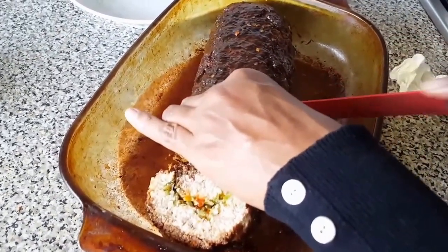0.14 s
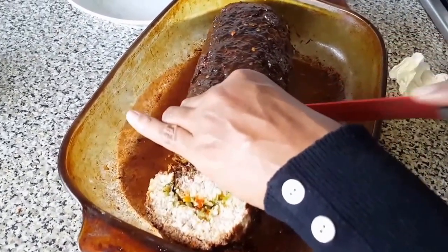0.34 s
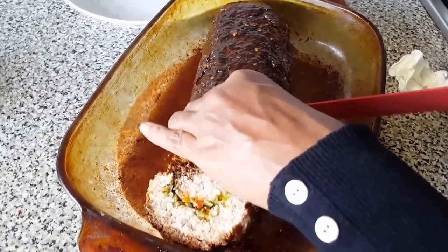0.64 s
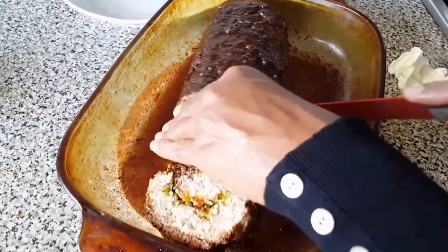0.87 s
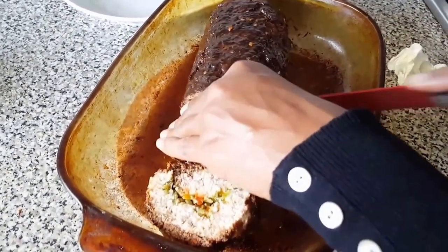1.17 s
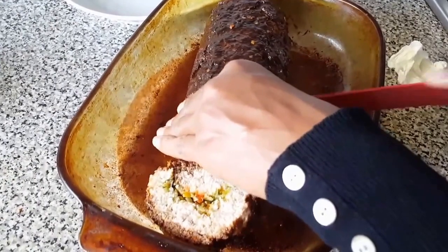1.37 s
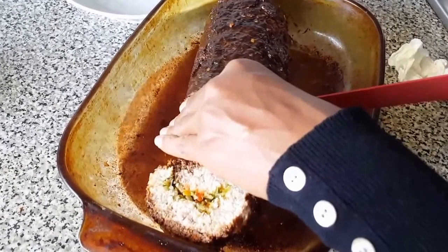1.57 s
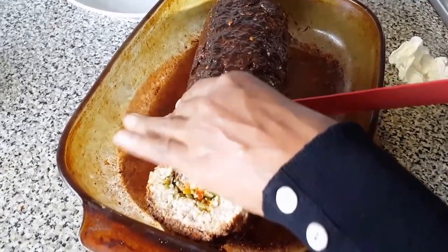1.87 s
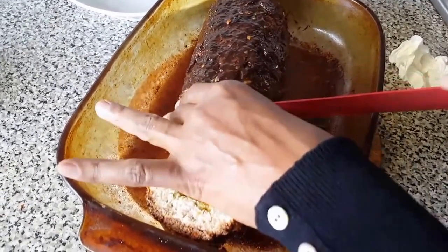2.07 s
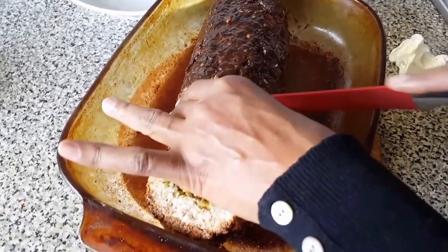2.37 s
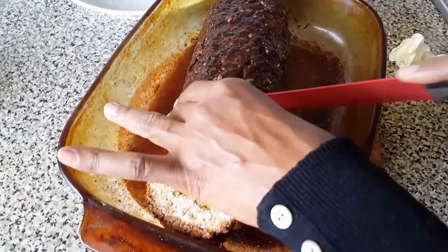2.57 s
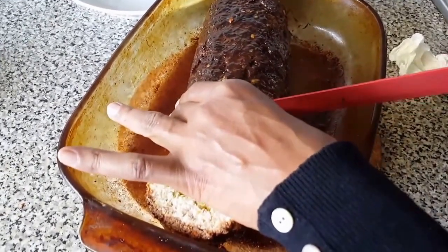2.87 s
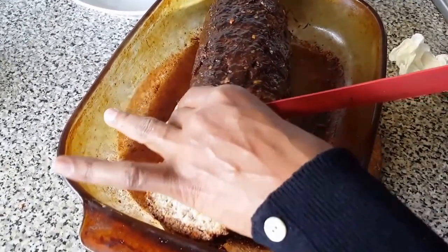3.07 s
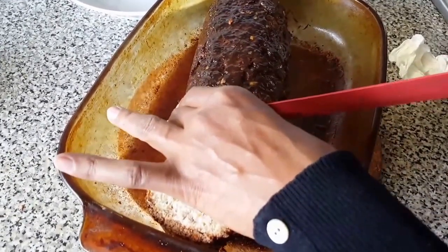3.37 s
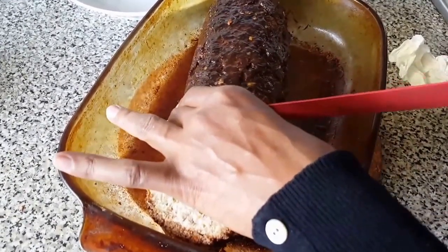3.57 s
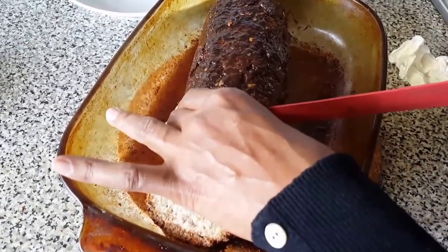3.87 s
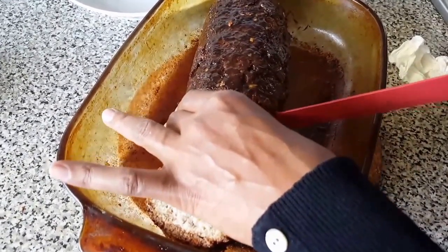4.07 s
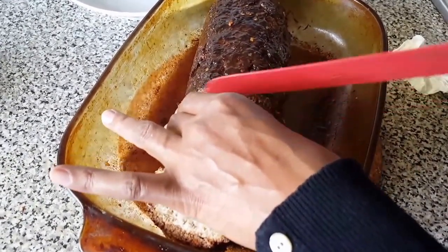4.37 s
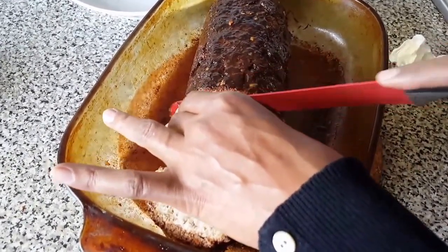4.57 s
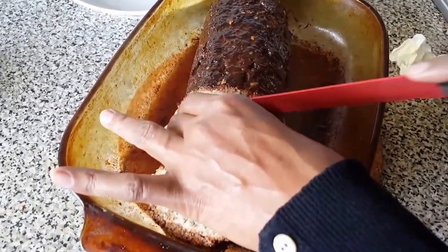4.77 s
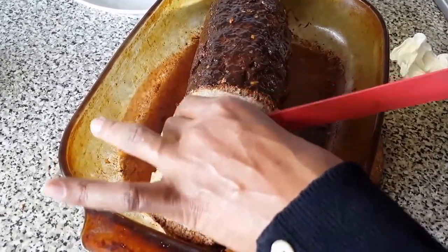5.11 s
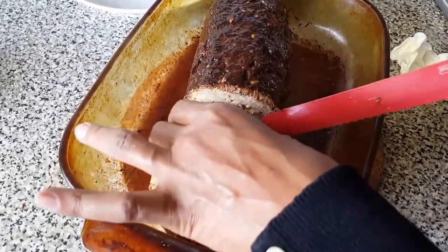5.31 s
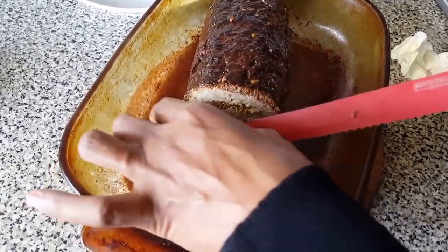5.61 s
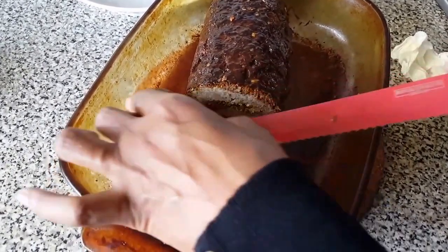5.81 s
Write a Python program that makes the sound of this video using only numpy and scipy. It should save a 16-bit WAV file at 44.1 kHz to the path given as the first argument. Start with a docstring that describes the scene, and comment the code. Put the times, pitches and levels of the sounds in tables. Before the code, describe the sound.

A serrated knife saws through a crusty baked roll, its blade clicking, knocking and scraping on a ceramic dish over a faint kitchen hum.

```python
"""A small hard kitchen, a stereo camera close to a ceramic dish; appliances hum throughout.
From the start a serrated knife saws through a baked roll: the crust crackles, each push makes the
worktop drone, and the blade knocks and scrapes on the dish, ringing it while the worktop booms.
The hardest knock comes at 4.7 s. After a few more scrapes the sawing dies down, and two soft bumps
on the worktop close the scene near 6 s."""
import sys
import numpy as np
from scipy import signal
from scipy.fft import rfft, irfft, next_fast_len
from scipy.io import wavfile
from scipy.ndimage import uniform_filter1d

SR = 44100
rng = np.random.default_rng(int(sys.argv[2]) if len(sys.argv) > 2 else 0)


def wrap_up_sound(samples):
    """Save the sound to the file named by the first command line argument, as 16-bit audio."""
    columns = np.atleast_2d(samples).T
    # keep every value between -1 and 1, then stretch to whole-number steps
    tamed = np.clip(columns, -1, 1)
    steps = np.round(tamed * 32767).astype(np.int16)
    wavfile.write(sys.argv[1], SR, steps)


N = 262306

# room tone behind the dish: f/Hz, relative level/dB
ROOM_TONE = [(12, -23.5), (20, -2), (49, -6), (101, -5.5), (203, -18), (345, -22.5), (419, -25), (539, -20),
             (866, -23), (1690, -24.5), (9300, -43), (13700, -32.5), (15800, -50.5)]
# appliance resonances: f/Hz, width/Hz, level/dB
APPLIANCES = [(239, 42, -71.5), (346.2, 12, -73), (576, 76, -72)]
# decay of the wall echoes: f/Hz, t60/s
WALL_DECAY = [(300, 0.18), (1100, 0.12), (3000, 0.23), (8000, 0.2)]
# roll and dish bump on the worktop: t/s, level/dB, f/Hz, level of the knock on top/dB
BUMPS = [(1.483, -37, 97.6, -54.5), (5.655, -48, 173, -49.5), (5.792, -52, 190, -48)]
# the hand leans on the roll: t of the top/s, length/s, drone level/dB
PUSHES = [(0.0, 0.23, -52), (0.27, 0.15, -55), (0.464, 0.12, -54), (0.665, 0.11, -52), (0.864, 0.14, -60),
          (0.993, 0.11, -59), (1.387, 0.18, -59.5), (1.556, 0.14, -56), (1.958, 0.38, -68),
          (2.497, 0.246, -63.5), (2.936, 0.3, -61), (3.146, .1, -68), (3.35, 0.13, -59.5),
          (3.559, 0.2, -69), (3.778, .1, -56), (3.877, 0.13, -56), (4.085, 0.17, -60),
          (4.266, 0.108, -77.5), (4.598, 0.097, -65.5), (4.953, 0.23, -64), (5.197, 0.22, -68),
          (5.727, 0.24, -66.5)]
# spectrum of the rustling crust: f/Hz, relative level/dB
RUSTLE_SPECTRUM = [(1530, -39.5), (2600, -15.5), (3180, -6.5), (4810, -3), (8450, -6), (14000, -11.5),
                   (14900, -26.5), (15300, -40.5)]
# course of the sawing: t/s, crust gain/dB
SAWING_GAIN = [(0.0, -66), (0.21, -71.5), (0.79, -70), (1.44, -65), (1.54, -66.5), (2.02, -73),
               (2.47, -72.5), (3.23, -70), (3.36, -70), (3.61, -71.5), (3.78, -66), (4.32, -79),
               (4.72, -86), (4.85, -64.5), (5.15, -71), (5.33, -80), (5.51, -75), (5.95, -85.5)]
# crust snaps under the teeth: t/s, level/dB, f/Hz, left minus right/dB
SNAPS = [(0.0365, -39.5, 3500, 3), (0.199, -51, 8000, 4), (0.277, -42, 6500, 1), (0.431, -39, 8550, 7),
         (0.782, -57, 5450, -25), (0.817, -50, 8960, 7), (0.852, -28, 7040, 2.5), (0.8703, -51, 3800, 7),
         (1.138, -42.5, 7000, 0.3), (1.427, -44, 5154, 0), (1.482, -37, 5610, 2), (1.738, -43.5, 8670, 4),
         (1.7581, -38, 4758, -1), (1.83, -56, 7120, -15), (1.884, -38, 5410, -0.5),
         (1.9513, -43.5, 8200, 1.5), (2.663, -44.5, 7200, 1), (2.8653, -49, 5900, -7),
         (2.9537, -48.5, 4324, -13), (2.966, -40, 5100, -2), (3.012, -51, 5300, -14.5),
         (3.049, -48, 7090, -5), (3.081, -40.5, 4700, -4), (3.0969, -44.5, 7050, -13),
         (3.1237, -44.5, 3380, -3), (3.3602, -42.5, 3920, 4), (3.5319, -51, 8700, -5),
         (3.7179, -34, 4070, -5), (3.91, -39.5, 6440, -2), (4.262, -46, 8238, 1.5), (4.32, -57, 5140, -2),
         (4.4062, -53.5, 5190, -13.5)]
# modes of the dish: f/Hz, relative level/dB, t60/s
DISH_MODES = [(745.3, -8, 0.23), (825.5, -12, 0.17), (947.2, -8, 0.16), (990, -7, 0.16), (1088, -9, 0.19),
              (1221.5, 4, 0.099), (1289, 10, 0.06), (1480, -0.5, 0.06), (1591, -5.5, 0.11),
              (1908, -5, 0.12), (2075, -6.5, 0.28), (2280, -8.5, 0.15), (2452, -8.5, 0.11),
              (2933, -16, 0.21), (3120, -12, 0.15), (3280, -20, 0.43), (3480, -5.5, 0.12), (3530, -3, 0.11),
              (3777, -1, 0.11), (4050, -5.5, 0.098), (4065, -8.5, 0.044), (4750, -19.5, 0.036),
              (5100, -5.5, 0.13), (5980, -9.5, 0.086), (5370, -10, 0.1), (6460, -22.5, .13),
              (7494, -10, 0.13), (9400, -18, 0.15)]
# bands in which the blade drives the dish: f/Hz
BANDS_HZ = [700, 1300, 2200, 4000, 7500, 12000]
# an average blow in each of those bands: relative level/dB
BLOW_SHARE_DB = [0, -1, -6, -2.5, -8, -27.5]
# teeth along the dish: t/s, length/s, gain/dB, swell/dB, dull rasp/dB, 2 kHz modes/dB, bright rasp/dB
STROKES = [(0.16, 0.12, -76.5, 6, 0, -6, 8.5), (0.4, 0.049, -70, 4, 1.5, -9.5, 8.5),
           (0.602, 0.086, -68.5, -1.5, -1, -7, 11.5), (0.827, 0.067, -70.5, -1.5, 0.3, -6, 12.5),
           (0.989, 0.1, -68.5, 1.5, 1, -8, 1), (1.115, 0.067, -85, 0.3, -7, -1, 9),
           (1.389, 0.039, -53, -12, -7, -12, -22), (1.47, 0.14, -61, -17, -5.5, -10, 9.5),
           (2.424, 0.098, -60.5, -4, -9.5, 3.5, 2), (2.594, .15, -65, 1.5, -13, -8, 2),
           (2.778, 0.052, -49, -10.5, -6, 4.5, 2), (2.993, 0.019, -62, -5.5, 4, -20, -13),
           (3.066, 0.056, -69, 8.5, -8, -16, 7.5), (3.171, 0.055, -64, 5.5, 4, 3, -2),
           (3.244, 0.041, -48, -6.5, -1.8, -2.5, -6), (3.338, 0.04, -61.5, 5.5, -3, 0, -3),
           (3.661, 0.05, -55, -13, -2, 2, -14), (3.701, 0.01, -38.5, -3.5, -20, -23, -10),
           (3.818, 0.081, -60.5, 0.5, 6.5, 12, 3), (3.971, 0.023, -70.5, -2.2, 5.5, 8, -3),
           (4.017, 0.097, -62, -2.5, -1.5, 8, 6), (4.789, 0.049, -56, 0, -15, -10, -22),
           (4.849, 0.17, -60.5, 3, -3, 6.5, 1.5), (5.019, 0.026, -40.5, -4.5, -15, -15, -12),
           (5.166, 0.046, -62.5, 5.5, -19, 2, 5), (5.248, 0.035, -67, -4, -16, 2, -4),
           (5.309, 0.16, -65, -2.5, -9, -1.5, 2), (5.51, 0.014, -58, -8.5, -6, 3.5, -16.5)]
# blade on the dish: t/s, level/dB, low modes/dB, hardness/(dB per octave), boom/dB, left minus right/dB
KNOCKS = [(0.057, -14, -14, 2, -40.5, -1), (0.492, -14, -6, 2.5, -40.5, -0.5),
          (0.9, -10, -6.5, 1.5, -39.5, -2), (1.02, -44, 10, -0.5, -84.5, -11.5),
          (1.218, -53, 2, 1.5, -54, -5), (1.24, -8, -12, 1.34, -37.5, -0.5),
          (2.24, -15, -10.5, 0, -43.5, -2), (2.256, -20, 14.5, -3.5, -40.5, 2.5),
          (2.273, -15.5, -3, 0, -37.5, -1), (2.754, -20, -5.5, -1.5, -45, -2),
          (3.008, -45.5, -1, -7, -60, 6), (3.221, -20, -21, -3.5, -50, 4.5),
          (3.228, -28.5, -10, -9, -43, -6), (3.609, -11, -8.5, -3, -40.5, 0),
          (3.706, -31, -34, -2.5, -52.5, 1.5), (3.794, -21, 0, -2.5, -49, -1.5),
          (4.679, -5.5, -1.5, 4, -31.5, -1), (5.024, -28, -15, -6, -54, -0.5),
          (5.469, -46.5, -18, 2, -76.5, 3), (5.517, -49.5, -10, -8, -65, -5)]
# at the microphones the treble favours the right: f/Hz, left minus right/dB
SIDE_BIAS = [(250, 0), (500, 0), (1500, 2.9), (4000, -3.5), (10000, -3.5)]

ROOM_TONE_DB, DRONE_REST_DB = -65.5, -69.5
WORKTOP_HZ, WORKTOP_UPPER_HZ, WORKTOP_T60_S = 103, 145.4, 0.26
STROKE_ATTACK_S, STROKE_T60_S = 0.013, 0.094
BOUNCE_S, BOUNCE_DB = 0.0068, -4.5
CAMERA_TOP_HZ = 15200


def undb(db):
    """Gain of a level in dB."""
    return 10 ** (np.asarray(db) / 20)


def rms(x):
    """Root mean square."""
    return np.sqrt(np.mean(x ** 2))


def level(x, db):
    """Scale to an rms level."""
    return x * undb(db) / rms(x)


def fade(t, t60):
    """Envelope that falls 60 dB in t60 s."""
    return np.exp(-np.log(1000) * t / t60)


def colour(x, table):
    """Shape the spectrum by points of f/Hz, gain/dB."""
    hz, db = np.transpose(table)
    n = next_fast_len(x.shape[-1])
    f = np.maximum(np.fft.rfftfreq(n, 1 / SR), 1)
    gain = undb(np.interp(np.log(f), np.log(hz), db))
    return irfft(rfft(x, n) * gain, n)[..., :x.shape[-1]]


def band(x, hz, width):
    """One resonance, its width in Hz."""
    return signal.lfilter(*signal.iirpeak(hz, hz / width, fs=SR), x)


def wander(rate, size=N):
    """Glide to a new random value every 1 / rate s; spread near 1."""
    hold = int(SR / rate)
    steps = np.repeat(rng.standard_normal(size // hold + 1), hold)
    return 1.1 * uniform_filter1d(steps, hold)[:size]


def grit(spread_db, channels, size=N):
    """Dense clicks of uneven size."""
    return rng.standard_normal((channels, size)) * undb(spread_db * np.minimum(rng.exponential(size=size), 4))


def add(out, start, sound, pan_db=0):
    """Mix a sound in at start/s; pan_db is left minus right."""
    i = int(start * SR)
    n = min(sound.shape[-1], N - i)
    out[:, i:i + n] += sound[..., :n] * undb(np.array([[pan_db], [-pan_db]]) / 2)


def kitchen():
    """Room tone, alike at both microphones only in the bass, with wavering appliance hum."""
    mid, side = colour(rng.standard_normal((2, N)), ROOM_TONE)
    side = colour(side, [(40, -13.5), (100, -7.5), (300, 6), (1000, 1.5)])
    air = level(np.array([mid + side, mid - side]), ROOM_TONE_DB)
    hum = sum(level(band(rng.standard_normal(N), hz, width), db) * undb(0.83 * wander(9.1))
              for hz, width, db in APPLIANCES)
    return air + hum


def wall_echoes(x, wet_db):
    """Dense echoes of hard walls close by, each band dying at its own rate."""
    t = np.arange(SR // 3) / SR
    tail = sum(band(rng.standard_normal((2, len(t))), hz, hz) * fade(t, t60) / np.sqrt(hz * t60)
               for hz, t60 in WALL_DECAY)
    tail *= t > 0.004  # nearest wall
    tail /= np.sqrt(np.sum(tail ** 2) / 2)
    return undb(wet_db) * signal.oaconvolve(x, tail, axes=1)[:, :N]


def bumps():
    """Roll and dish bump the worktop: a short low ring with a knock on top."""
    out, t = np.zeros((2, N)), np.arange(SR // 3) / SR
    for start, db, hz, knock_db in BUMPS:
        low = undb(db) * np.sin(2 * np.pi * hz * t) * fade(t, 25 / hz)
        knock = band(band(rng.standard_normal(len(t)), 320, 400), 314, 405)
        knock = level(knock, knock_db) * fade(t, 0.092)
        add(out, start, (low + knock) * (1 - fade(t, 0.043)))
    return out


def worktop_drone():
    """Each push of the hand swells the worktop's low resonance."""
    t = np.arange(N) / SR
    cycles = np.cumsum(WORKTOP_HZ + 4 * wander(25)) / SR
    rumble = 0.89 * level(band(rng.standard_normal(N), WORKTOP_HZ, 25), -3.2)
    pushes = sum(undb(db) * np.exp(-(2 * (t - top) / length) ** 2) for top, length, db in PUSHES)
    return level(np.sin(2 * np.pi * cycles) + rumble, 0) * (undb(DRONE_REST_DB) + pushes)


def worktop_boom():
    """The worktop answers a blow a little late, with a low tone and a rattle above it."""
    t = np.arange(SR // 4) / SR
    low = fade(t, WORKTOP_T60_S) * np.sin(2 * np.pi * WORKTOP_HZ * t)
    noise = rng.standard_normal((3, len(t)))  # shared, left, right
    rattle = level(band(noise[0] + 0.4 * noise[1:], WORKTOP_UPPER_HZ, 160), -1.5)
    return (1 - fade(t, 0.024)) * (low + 0.72 * fade(t, 0.18) * rattle)


def crackle(per_s=70, spread_db=3):
    """Tiny crumbs break at random, per_s times a second in each of four treble bands."""
    out = 0
    for hz in (4500, 6500, 9000, 12000):
        breaks = (rng.random(N) < per_s / SR) * undb(spread_db * rng.exponential(size=N))
        envelope = signal.lfilter([1], [1, -fade(1 / SR, 0.016)], breaks)
        out += level(band(envelope * rng.standard_normal((2, N)), hz, hz / 2), 0)
    return out


def sawing():
    """The crust rustles and crackles under the moving teeth."""
    t = np.arange(N) / SR
    crumbs = grit(3.6, channels=2) * undb(3.5 * np.clip(wander(56), -2, 2))
    crust = level(colour(crumbs, RUSTLE_SPECTRUM), 0.26) + level(crackle(), -5.5)
    return crust * undb(np.interp(t, *np.transpose(SAWING_GAIN)))


def snaps():
    """The crust breaks in bursts of a few ms, each around its own pitch."""
    out, t = np.zeros((2, N)), np.arange(1024) / SR
    for start, db, hz, pan_db in SNAPS:
        burst = rng.standard_normal((2, len(t))) * fade(t, 0.016)
        burst = band(band(burst, hz, hz), hz, hz)
        nominal_peak = 3.5 * rms(burst[:, :100])
        add(out, start, burst * undb(db) / nominal_peak, pan_db)
    return out


def dish(share_db, t60_scale, linger=0.094, lag_s=0.00008, detune=0.0065, split_hz=30, size=SR // 6):
    """Ring of the dish; each mode reaches the two microphones with its own phase difference."""
    hz, db, t60 = np.transpose(DISH_MODES)[:, :, None]
    t = np.arange(size) / SR
    gain_draw, pitch_draw, phase_draw, split_draw, beat_draw = rng.standard_normal((5, len(hz), 1))
    hz = hz * (1 + detune * pitch_draw)
    gain = undb(db + np.interp(np.log(hz), np.log(BANDS_HZ), share_db) + 1.5 * gain_draw)
    gain[1::2] *= -1  # neighbouring modes swing opposite ways under the blade
    # the hand and the roll soak up most of the ring at once, a little lingers
    decay = fade(t, t60_scale * t60) + linger * fade(t, t60) * np.minimum(3800 / hz, 1) ** 2
    beat = 1 + 0.55 * np.exp(2j * np.pi * (split_hz * split_draw * t + beat_draw))  # close mode pairs
    ring = gain * decay * beat * np.exp(2j * np.pi * hz * t)
    shift = 2 * np.pi * hz * lag_s + 0.7 * phase_draw * np.minimum(hz / 3000, 1) ** 2
    stereo = np.array([ring * np.exp(1j * shift), ring]).sum(1).imag
    return signal.sosfilt(signal.butter(4, 600, "highpass", fs=SR, output="sos"), stereo)


def scraping():
    """Teeth rasp along the glaze; every stroke finds another mix of heavily damped modes."""
    out = np.zeros((2, N))
    shares_db = [[-30, -9.5, -20, -41.5, -42.5, -39.5],  # body
                 [-36.5, -16.5, -5.5, -20, -43, -45],  # upper
                 [-40, -42.5, -22.5, -5, 3.5, -13.5]]  # ping
    hiss_spectrum = [(2000, -26), (3000, -1.5), (3900, -12.5), (5000, -2.5), (8000, -5), (12000, -23.5)]
    for start, length, db, swell_db, dull_db, upper_db, bright_db in STROKES:
        t = np.arange(0, length + STROKE_T60_S, 1 / SR)
        teeth = grit(3, channels=1, size=len(t)) * undb(1.6 * wander(50, size=len(t)))
        rings = [dish(share, t60_scale=0.14, linger=0, size=2048) for share in shares_db]
        body, upper, ping = (signal.fftconvolve(teeth, ring)[:, :len(t)] for ring in rings)
        dull = band(band(teeth, 743, 250), 743, 250)
        hiss = colour(grit(2.6, channels=2, size=len(t)), hiss_spectrum)
        bright = level(hiss, -7) + level(ping, -6)
        rasp = level(body, 0) + level(dull, dull_db) + level(upper, upper_db) + bright * undb(bright_db)
        press = np.minimum(t / STROKE_ATTACK_S, 1) * undb(swell_db * np.minimum(t / length, 1))
        release = fade(np.maximum(t - length, 0), STROKE_T60_S)
        add(out, start, rasp * undb(db) * press * release)
    return out


def blow_share(low_db, hardness):
    """A harder contact tilts the blow to the treble; the lowest modes depend on where it lands."""
    share_db = BLOW_SHARE_DB + hardness * np.log2(np.divide(BANDS_HZ, BANDS_HZ[1]))
    share_db[0] = low_db
    share_db[-1] += 0.36 * hardness * abs(hardness)  # the top band follows hardness faster still
    return share_db


def crack(share_db, t):
    """The brief noise of steel meeting ceramic, wide across the microphones."""
    crack_db = share_db + [3.5, -11, -0.5, -4, -9, -8]
    spectrum = [(500, -55), *zip(BANDS_HZ, crack_db), (16000, share_db[-1] - 13.5)]
    noise = rng.standard_normal((3, len(t)))
    return undb(7) * colour(noise[0] + 2.4 * noise[1:], spectrum) * fade(t, 0.026)


def knocks():
    """The blade cracks on the dish and its teeth chatter into the modes; gives blows and worktop booms."""
    blows, booms = np.zeros((2, 2, N))
    t = np.arange(2048) / SR
    for start, db, low_db, hardness, boom_db, pan_db in KNOCKS:
        share_db = blow_share(low_db, hardness)
        chatter = 0.12 * rng.standard_normal(400) * (rng.random(400) < 0.03) * fade(t[:400], 0.02)
        chatter[0] = 1
        chatter[int(BOUNCE_S * SR)] = undb(BOUNCE_DB)  # the springy blade lands a second time
        blow = signal.fftconvolve(dish(share_db, t60_scale=0.22), chatter[None])
        blow[:, :len(t)] += crack(share_db, t)
        blow[:, :len(t)] *= 1 - fade(t, 0.002)  # the edge takes a moment to press home
        nominal_peak = 3 * rms(blow[:, :400])
        add(blows, start, blow * undb(db) / nominal_peak, pan_db)
        add(booms, start, undb(boom_db) * worktop_boom())
    return blows, booms


def scene():
    """Knife, roll and dish up close, the sharp sounds echoed by the walls, the kitchen behind."""
    blows, booms = knocks()
    sharp = blows + snaps() + scraping()
    near = sharp + wall_echoes(sharp, wet_db=-10) + sawing() + worktop_drone()
    left = colour(near[0], [(hz, db / 2) for hz, db in SIDE_BIAS])
    right = colour(near[1], [(hz, -db / 2) for hz, db in SIDE_BIAS])
    return np.array([left, right]) + booms + bumps() + kitchen()


def record(dry):
    """The camera cuts the top treble steeply."""
    return signal.sosfilt(signal.ellip(8, 0.2, 80, CAMERA_TOP_HZ, fs=SR, output="sos"), dry)


dry = scene()
out = record(dry)
wrap_up_sound(out)
```